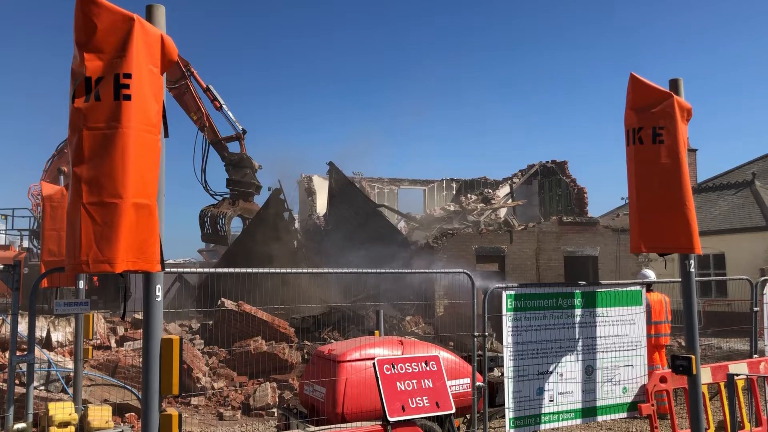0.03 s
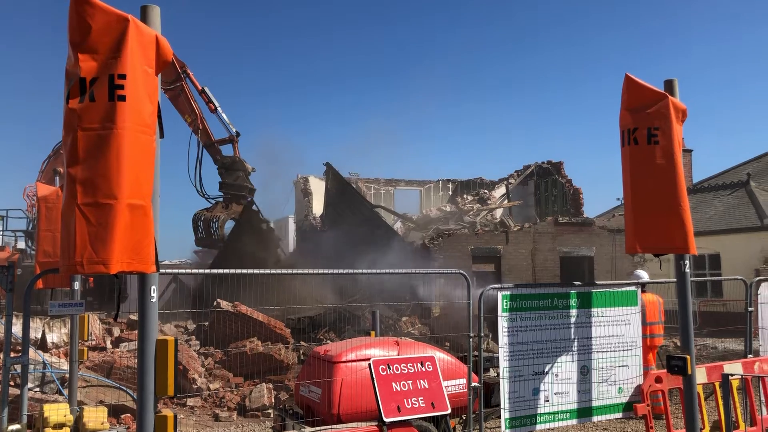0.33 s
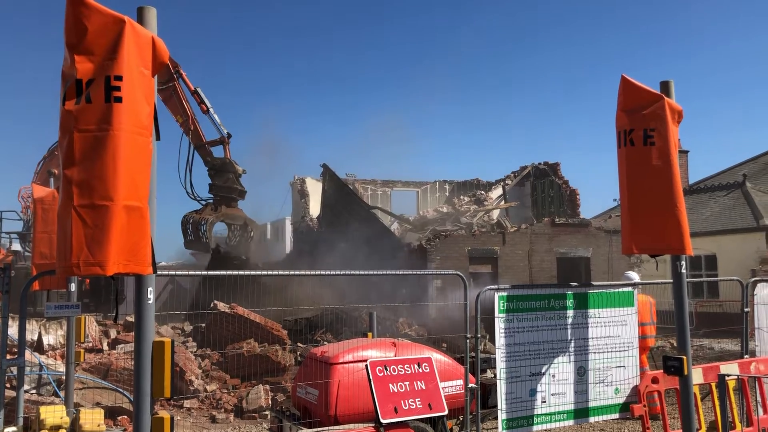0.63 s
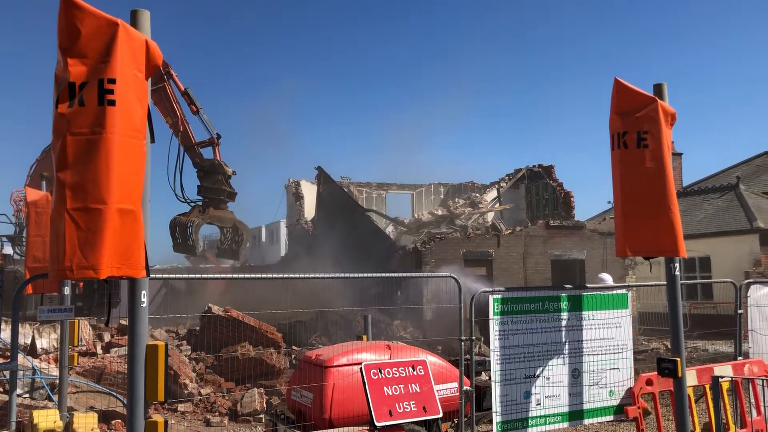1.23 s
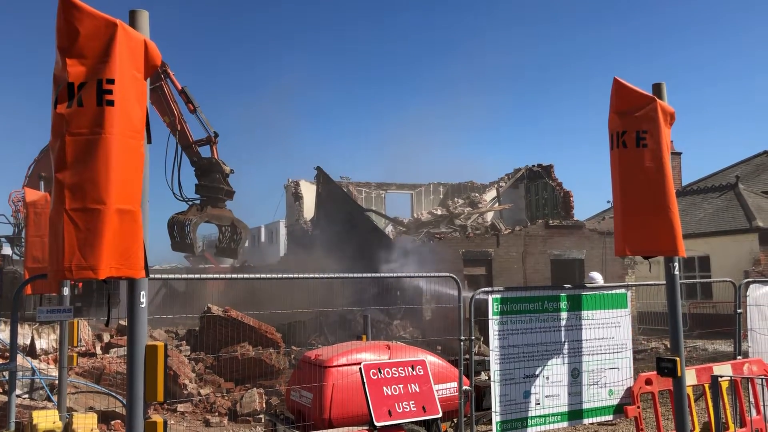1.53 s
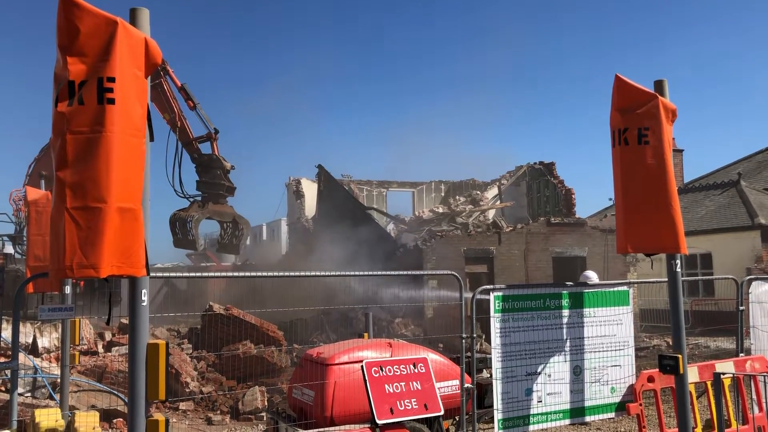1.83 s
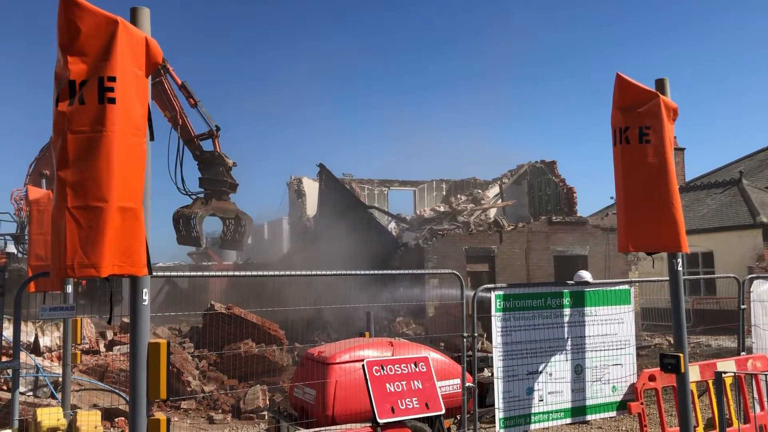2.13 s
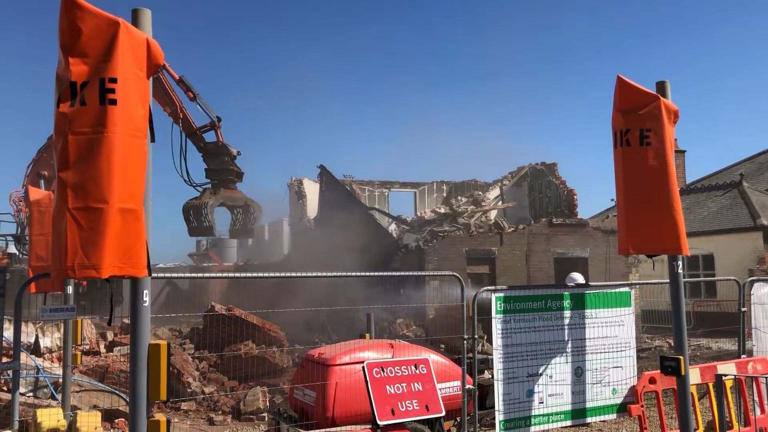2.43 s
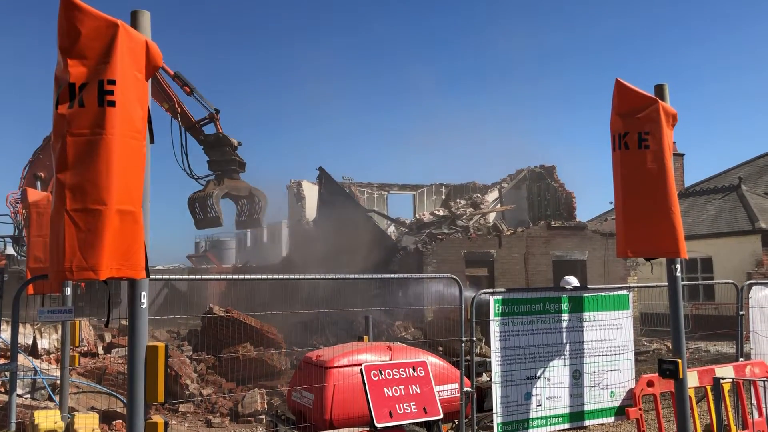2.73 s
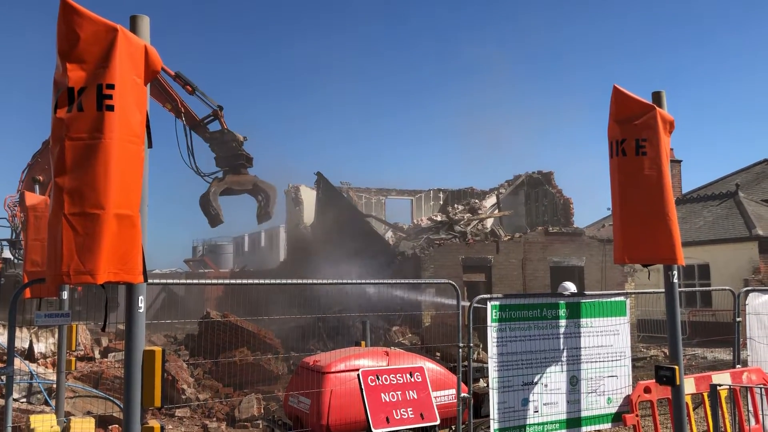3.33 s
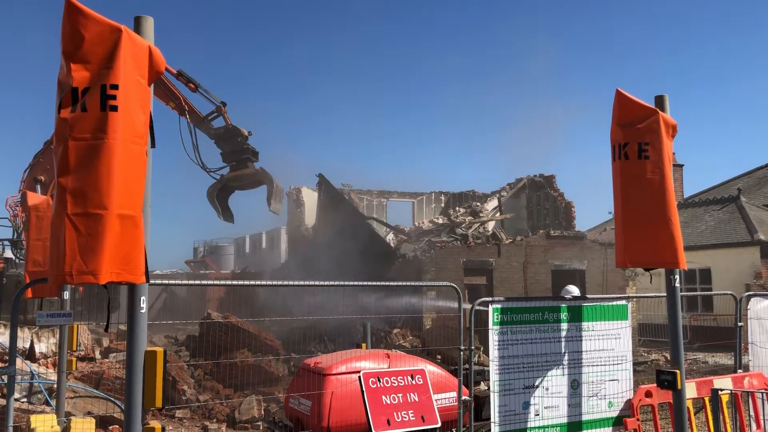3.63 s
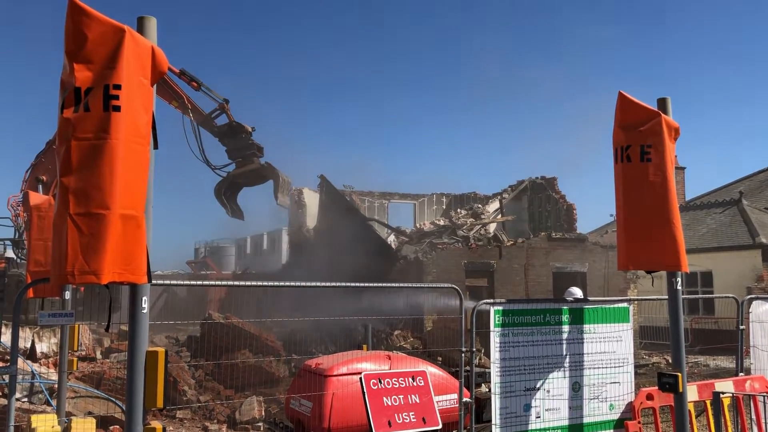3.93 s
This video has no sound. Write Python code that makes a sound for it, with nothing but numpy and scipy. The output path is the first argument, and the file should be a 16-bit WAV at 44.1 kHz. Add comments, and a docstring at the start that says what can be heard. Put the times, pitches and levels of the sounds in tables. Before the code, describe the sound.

A diesel excavator runs with a low, steady rumble, a short way off in the open air. Bricks and rubble slide and thud softly at first, then the engine carries on with a rising hydraulic hum and faint spray.

```python
"""A diesel engine runs at steady speed on a demolition site, heard from behind the fence. Its periodic
cycle gives a harmonic throb and whine, and its knocks excite the resonances of the metal covers.
The excavator rumbles, and its hydraulics drone upward as the grab lifts, over the faint hiss of a water
spray. Early on, masonry tumbles and rubble slides in soft bursts of many small collisions, while single
chips clack and heavy pieces thud; one last thud comes later."""
import sys
import numpy as np
from scipy import signal
from scipy.fft import rfft, irfft
from scipy.io import wavfile
from scipy.ndimage import uniform_filter1d

SR = 44100
rng = np.random.default_rng(int(sys.argv[2]) if len(sys.argv) > 2 else 0)


def int16_out(signal):
    """Quantize to a 16-bit WAV file."""
    q = np.round(np.clip(np.atleast_2d(signal).T, -1, 1) * 32767)
    wavfile.write(sys.argv[1], SR, q.astype(np.int16))


N = 176400
T = np.arange(N) / SR
CYCLE_HZ, WHINE_WAVER_DB = 23.29, 0.4

def undb(db):
    """Decibels to amplitude ratio."""
    return 10 ** (np.asarray(db) / 20)

def unit(x):
    """Normalise to rms 1."""
    return x / np.sqrt(np.mean(x ** 2))

def curve(table, column=1):
    """Linear interpolation of one column in time."""
    rows = np.array(table, float)
    return np.interp(T, rows[:, 0], rows[:, column])

def noise():
    """White Gaussian noise."""
    return rng.standard_normal(N)

def colour(x, spectrum):
    """Spectral shaping by (freq_hz, gain_db) points, with a roll-off below the first; rms 1."""
    hz, db = np.array(spectrum, float).T
    f = np.maximum(np.arange(N // 2 + 1) * SR / N, 1)
    gain = undb(np.interp(np.log(f), np.log(hz), db)) / (1 + (hz[0] / f) ** 2)
    return unit(irfft(rfft(x) * gain, N))

def walk(rate_hz):
    """Slow random modulation: held values, smoothed twice; rms 1."""
    hold = int(SR / rate_hz)
    steps = np.repeat(rng.standard_normal(N // hold + 1), hold)[:N]
    return unit(uniform_filter1d(uniform_filter1d(steps, hold), hold))

def burst(start_s, rise_s, decay_s):
    """Envelope of a damped transient: linear rise, exponential decay."""
    age = T - start_s
    return np.clip(age / rise_s, 0, 1) * np.exp(-np.maximum(age - rise_s, 0) / decay_s)

def bursts(table):
    """Joint envelope of incoherent bursts, which add in power."""
    return np.sqrt(sum((undb(db) * burst(start, rise, decay)) ** 2 for start, rise, decay, db in table))

def partials(cycles, table, waver_db):
    """Harmonics of the cycle rate, each wavering in level and phase in the open air."""
    out = np.zeros(N)
    for harmonic, db in table:
        amplitude = np.sqrt(2) * undb(db + waver_db * walk(5.03))
        turns = harmonic * cycles + rng.random() + 0.051 * walk(4)
        out += amplitude * np.sin(2 * np.pi * turns)
    return out

def exhaust(cycles):
    """Periodic exhaust pulses throb at low harmonics of the cycle rate."""
    # exhaust partials: harmonic, level_db
    throb = [(2, -41.5), (3, -39.5), (4, -45), (5, -41.5), (6, -44.5), (7, -42), (8, -44.5), (10, -51.5),
             (11, -47), (12, -49)]
    return partials(cycles, throb, waver_db=2.18)

def machine_whine(cycles):
    """Periodic machine motion gives a faint whine of high harmonics."""
    # whine partials: harmonic, level_db
    whine = [(27, -63), (29, -66.5), (38, -66), (49, -74), (53, -75), (55, -71), (58, -71), (60, -71.5),
             (61, -68.5), (62, -71.5), (68, -66)]
    return partials(cycles, whine, WHINE_WAVER_DB)

def gear(cycles, pulse_place=0.75):
    """Beating: neighbouring gear-mesh partials come into phase and pulse once a cycle."""
    # gear-mesh partials: harmonic, level_db
    mesh = [(33, -55), (34, -54), (35, -69.5), (36, -63.5)]
    # swell of the whine: time_s, gain_db
    swell = [(0, -3), (1.8, 0), (4, -0.7)]
    whine = sum(undb(db) * np.sin(2 * np.pi * harmonic * (cycles - pulse_place)) for harmonic, db in mesh)
    return np.sqrt(2) * whine * undb(curve(swell) + WHINE_WAVER_DB * walk(10))

def knock_envelope(cycles, floor=0.5, scatter_db=1.5):
    """Amplitude modulation: a broad and a sharp knock in each cycle rise above a steady floor."""
    # Gaussian pulses: place_cycles, width_cycles, strength
    pulses = [(0.86, 0.1, .65), (.225, .025, .6)]
    train = np.zeros(N)
    for place, width, strength in pulses:
        offset = (cycles - place + .5) % 1 - .5
        train += strength * np.exp(-.5 * (offset / width) ** 2)
    return floor + undb(scatter_db * walk(35)) * train

def knocks(cycles, envelope, ring_db=-62, clatter_db=-57.5):
    """Knocking has a repeating part with a line spectrum and a random part with a continuous one."""
    # spectrum of the repeating ring: freq_hz, gain_db
    ring_spectrum = [(300, -20.5), (600, -1.5), (1450, -9), (2400, -19), (6000, -44)]
    # spectrum of the random clatter: freq_hz, gain_db
    clatter_spectrum = [(200, -3.5), (500, -2), (900, 4.5), (1500, 0.5), (2000, -8), (2800, -17),
                        (4000, -30), (5000, -37.5), (8000, -37.5), (15000, -48)]
    count = int(SR / CYCLE_HZ)
    pattern = np.interp(cycles % 1, np.arange(count) / count, rng.standard_normal(count))
    ring = undb(ring_db) * colour(pattern * envelope, ring_spectrum)
    clatter = undb(clatter_db) * colour(noise() * envelope, clatter_spectrum)
    return ring + clatter

def resonate(x, hz, q):
    """Response of a second-order resonator of quality factor q; rms 1."""
    return unit(signal.lfilter(*signal.iirpeak(hz, q, fs=SR), x))

def panels(rattle, bandwidth_hz=65):
    """Forced vibration: the rattle drives the modes of the engine's metal covers."""
    # cover modes: freq_hz, level_db
    modes = [(2270, -76), (2770, -76), (3450, -81)]
    return sum(undb(db) * resonate(rattle, hz, hz / bandwidth_hz) for hz, db in modes)

def diesel(speed_wobble=0.000706):
    """Phase locking: one nearly steady engine cycle times the throb, whines and knocks."""
    cycles = np.cumsum(CYCLE_HZ * (1 + speed_wobble * walk(2.99))) / SR
    envelope = knock_envelope(cycles)
    knocking = knocks(cycles, envelope)
    tones = exhaust(cycles) + machine_whine(cycles) + gear(cycles)
    return knocking + tones + panels(noise() * envelope)

def hydraulics(jitter=0.0059, waver_db=1.3, octave_db=-19):
    """A fundamental and its octave glide upward in frequency as the grab lifts."""
    # hydraulic drone: time_s, pitch_hz, level_db
    drone = [(0, 262, -29), (.25, 271, -37), (.38, 271, -40), (.52, 272, -52.5), (.92, 275, -42.5),
             (1.2, 277, -38.5), (1.55, 275, -42), (2.0, 284, -42.5), (2.35, 289, -38), (2.54, 295, -44),
             (2.67, 301, -52.5), (2.87, 308, -42), (3.06, 312, -51.5), (3.52, 324, -50), (3.63, 329, -41),
             (4, 334, -48.5)]
    phase = 2 * np.pi * np.cumsum(curve(drone) * (1 + jitter * walk(30))) / SR
    tone = np.sqrt(2) * (np.sin(phase) + undb(octave_db) * np.sin(2 * phase))
    return tone * undb(curve(drone, column=2) + waver_db * walk(18))

def excavator():
    """Low-frequency noise whose amplitude follows the machine's effort."""
    # strength of the rumble: time_s, level_db
    effort = [(0, -29.5), (.35, -32), (.47, -32.5), (1.1, -30.5), (1.7, -33), (2.3, -35.5), (2.6, -36),
              (3.4, -36), (4, -33.5)]
    # rumble spectrum: freq_hz, gain_db
    spectrum = [(20, -27.5), (32, -18.5), (65, 6.5), (100, -1.5), (170, 1), (350, -10), (480, -16.5),
                (700, -20.5), (2000, -43), (5000, -73.5)]
    return undb(curve(effort)) * colour(noise(), spectrum)

def spray(level_db=-69):
    """Steady broadband noise from the distant water jet that lays the dust."""
    # hiss spectrum: freq_hz, gain_db
    spectrum = [(500, -0.5), (3000, 1), (4200, -4.5), (5200, -7), (10000, -19), (15500, -29.5)]
    return undb(level_db) * colour(noise(), spectrum)

def grains(rate_per_s=2600, spread_db=3, scatter_s=0.0056, scatter_share=0.6):
    """Shot noise: dense collisions of uneven size, smeared by scattering among the walls."""
    sizes = undb(spread_db * np.minimum(rng.exponential(size=N), 4))
    clicks = (rng.random(N) < rate_per_s / SR) * np.sign(noise()) * sizes
    tail = signal.fftconvolve(clicks, noise() * np.exp(-T / scatter_s))[:N]
    return np.sqrt(1 - scatter_share) * unit(clicks) + np.sqrt(scatter_share) * unit(tail)

def masonry():
    """The overlapping impacts of tumbling masonry merge into a dull noise."""
    # strength of the tumbling: time_s, level_db
    tumble = [(0, -46.5), (.09, -38.5), (.35, -45), (.5, -45.5), (.65, -41.5), (.85, -47), (1.4, -51),
              (2.0, -65.5), (4, -66)]
    # masonry spectrum: freq_hz, gain_db
    spectrum = [(100, -13.5), (300, 8.5), (500, 3.5), (750, -11), (3000, -30), (12000, -68)]
    return undb(curve(tumble)) * colour(grains(), spectrum)

def rubble():
    """Sliding pieces of four sizes collide independently, each size resonating in its own register."""
    # resonance of each size: freq_hz
    piece_hz = (500, 1100, 2200, 4400)
    # slides: start_s, rise_s, decay_s, level_db
    slides = [(.06, 0.024, 0.02, -54), (.588, .005, 0.024, -42), (.632, 0.016, 0.04, -46),
              (.69, 0.004, 0.012, -46), (.962, 0.04, 0.067, -46.5), (1.005, 0.032, 0.082, -43.5),
              (1.105, 0.011, 0.086, -48), (1.175, 0.0093, 0.055, -48.5), (1.31, 0.015, .06, -54)]
    # rubble spectrum: freq_hz, gain_db
    spectrum = [(150, -9.5), (400, -0.5), (700, 8), (2100, -7.5), (3000, -11), (4300, -22.5), (5800, -23.5),
                (8000, -34), (12000, -51.5)]
    collisions = sum(resonate(grains(), hz, q=1) * np.sqrt(hz) for hz in piece_hz)
    return bursts(slides) * colour(collisions, spectrum)

def chips(relative_bandwidth=0.29):
    """Single bricks and chips clack: heavy damping makes each resonance broad and brief."""
    # clacks: start_s, pitch_hz, level_db
    clacks = [(0.091, 620, -34), (.094, 2900, -60), (.213, 5300, -65.5), (0.265, 6200, -67),
              (.271, 7800, -62), (.597, 1250, -43.5), (.596, 6500, -61), (.606, 2700, -52), (.63, 600, -33),
              (.695, 5200, -69), (0.982, 1380, -39), (1.028, 780, -38), (1.128, 1300, -48),
              (1.188, 1150, -46)]
    q = 1 / relative_bandwidth
    out = np.zeros(N)
    for start, hz, db in clacks:
        ring = resonate(resonate(noise(), hz, q), hz, q)
        out += undb(db) * ring * burst(start, rise_s=0.0015, decay_s=0.0041)
    return out

def thuds():
    """The impacts of heavy pieces give damped bursts of low-frequency noise."""
    # landings: start_s, rise_s, decay_s, level_db
    landings = [(.23, 0.036, 0.07, -32.5), (.29, 0.018, 0.059, -29), (.545, 0.0093, 0.037, -27),
                (.66, 0.0095, 0.04, -28.5), (.81, 0.032, 0.11, -32.5), (.99, 0.018, 0.1, -29.5),
                (2.19, 0.012, 0.055, -26.5)]
    # thud spectrum: freq_hz, gain_db
    spectrum = [(20, -36.5), (42, -6.5), (62, 11), (90, -9), (130, -3), (250, -12.5), (500, -29),
                (1500, -82)]
    return bursts(landings) * colour(noise(), spectrum)

def scene():
    """Superposition of all sources at one microphone."""
    machines = diesel() + hydraulics() + excavator()
    debris = masonry() + rubble() + thuds() + chips()
    return (machines + debris + spray())[None]

def record(dry, low_cut_hz=30, top_hz=15700, fade_in_s=0.004):
    """Band limiting: after a brief fade-in, filters cut the deepest bass and the highest treble."""
    highpass = signal.butter(4, low_cut_hz, "high", fs=SR, output="sos")
    lowpass = signal.ellip(8, .2, 70, top_hz, fs=SR, output="sos")
    faded = dry * np.minimum(T / fade_in_s, 1)
    return signal.sosfilt(lowpass, signal.sosfilt(highpass, faded))

dry = scene()
out = record(dry)
int16_out(out)
```